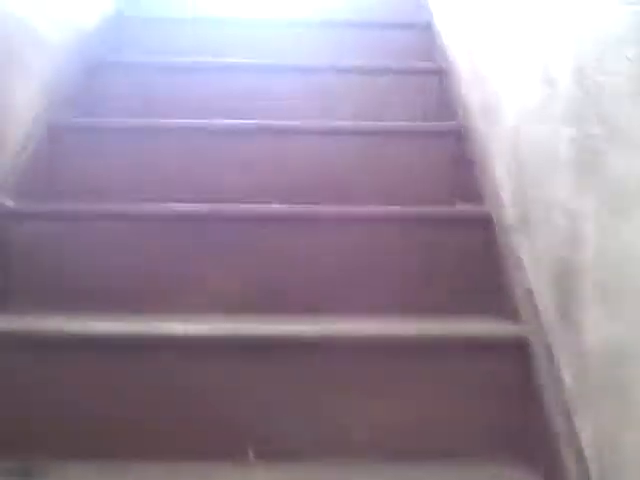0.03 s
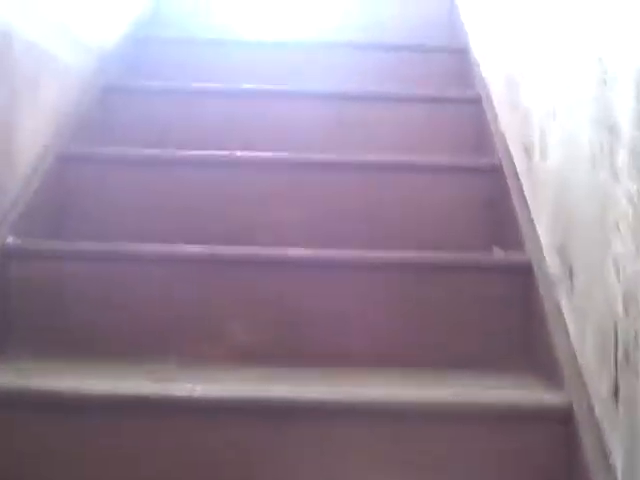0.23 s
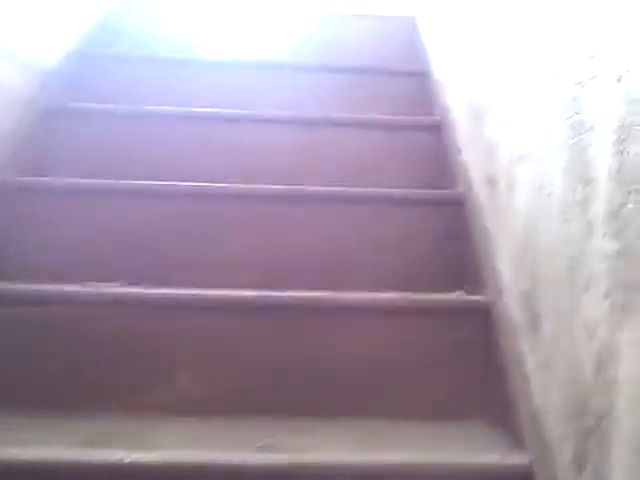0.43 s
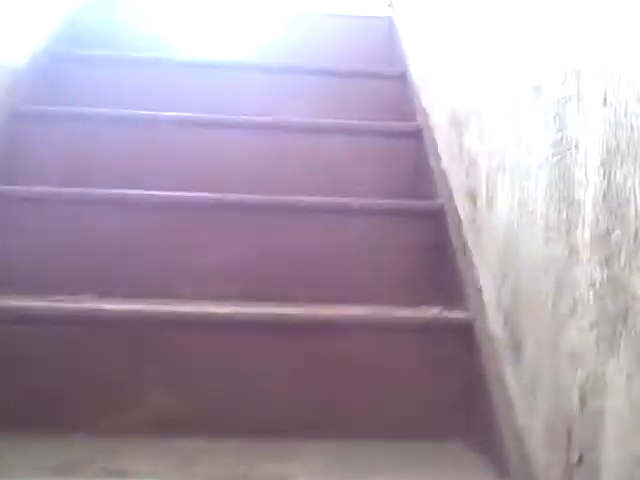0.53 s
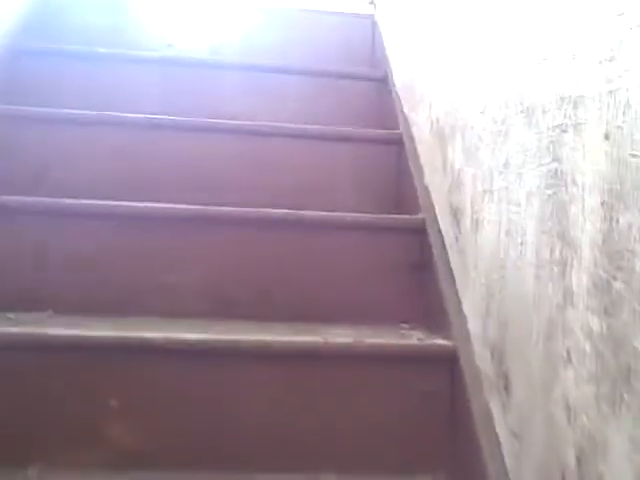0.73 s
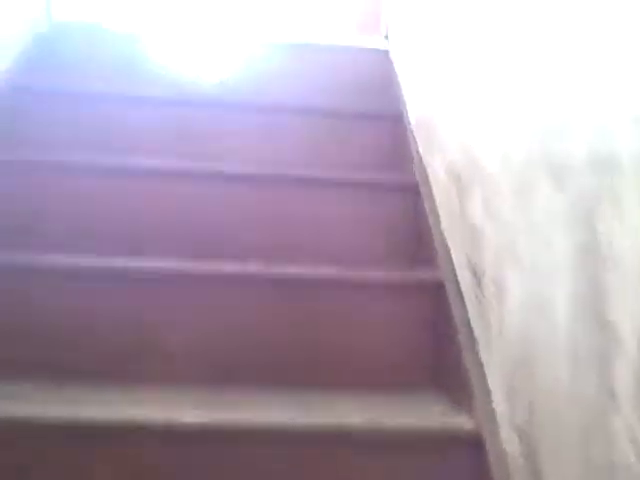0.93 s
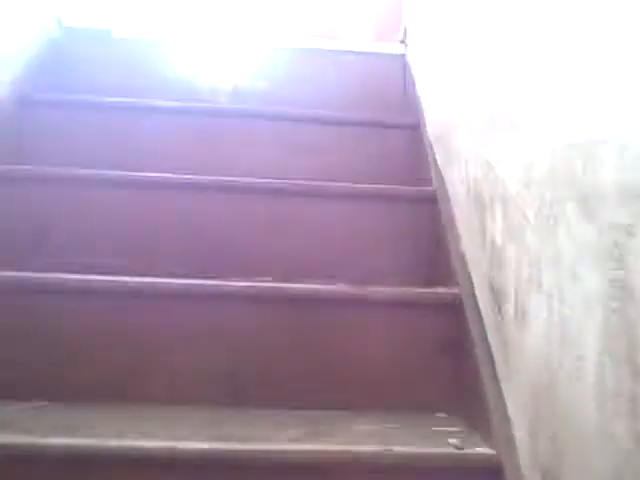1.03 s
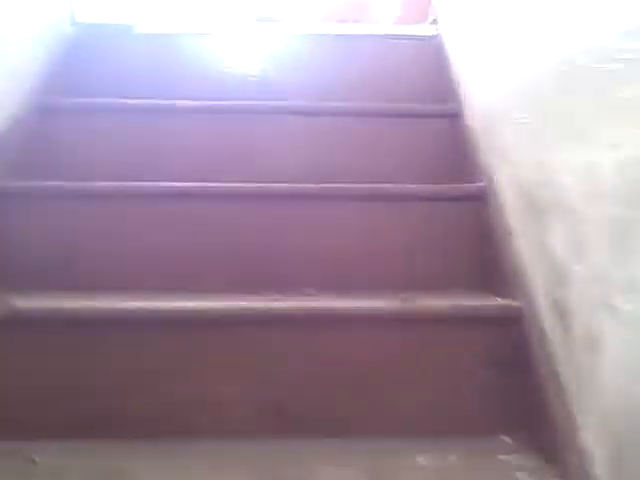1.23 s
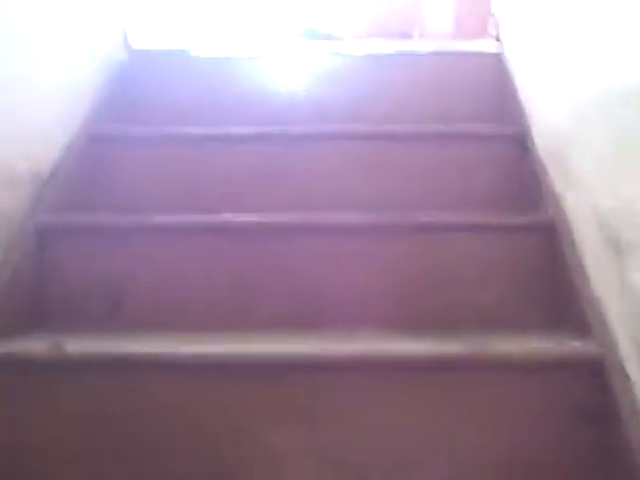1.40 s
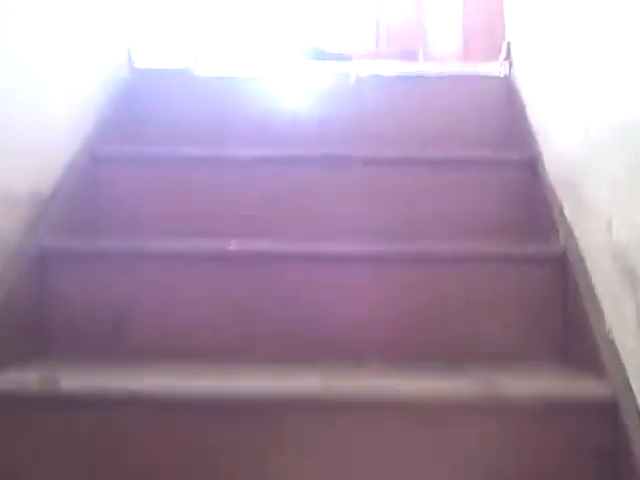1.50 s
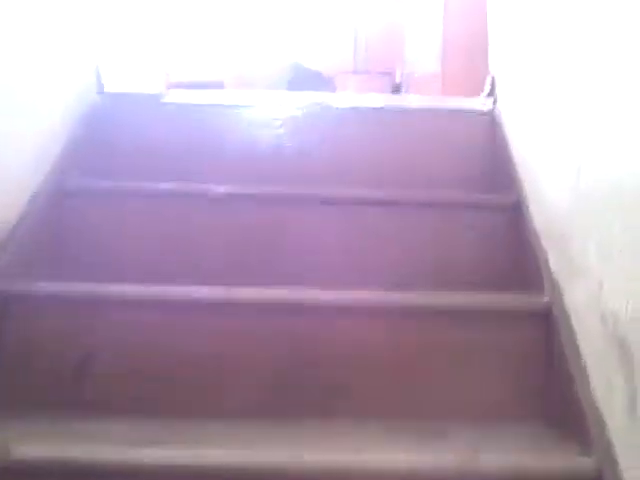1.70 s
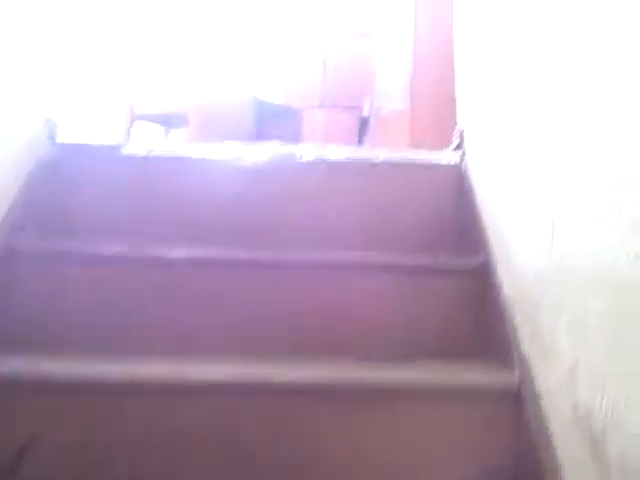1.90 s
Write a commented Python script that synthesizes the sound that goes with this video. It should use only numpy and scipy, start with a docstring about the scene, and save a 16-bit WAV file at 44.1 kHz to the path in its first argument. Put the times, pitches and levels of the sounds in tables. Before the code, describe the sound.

Heavy footsteps climb wooden stairs, three booming treads with faint squeaks and clothing rustle.

```python
"""Three heavy footsteps climb a narrow wooden staircase between plaster walls, over low rumble and hiss.
After a soft scuff the first lands at 0.24 s: the sole slaps the tread, the weight makes the flight
thud and boom, and the stairwell rings briefly. The second lands at 0.86 s between two faint squeaks,
the third at 1.45 s. Shoes and clothes scuff and rustle between the steps and after the last."""
import sys
import numpy as np
from scipy import signal
from scipy.io import wavfile

SR = 44100
rng = np.random.default_rng(int(sys.argv[2]) if len(sys.argv) > 2 else 0)


def inscribe(sig):
    """Save sig as 16-bit PCM at rate SR to the path in sys.argv[1].

    A 1-D sig is mono; a 2-D sig holds one channel per row.
    Samples are clipped to [-1, 1] before scaling.
    """
    pcm = np.round(np.clip(np.atleast_2d(sig).T, -1, 1) * 32767)
    wavfile.write(sys.argv[1], SR, pcm.astype(np.int16))


N = 85995
T = np.arange(N) / SR

# Footfalls. Each row: start in seconds, boom, knock, slap and grit gains in dB, thud level in dB,
# thud pitch in Hz, thud swell in seconds, stairwell gain in dB.
STEPS = [(0.2361, 4, 2.5, 3.5, 4.5, -22, 42, 0.0055, -3), (0.857, 0.5, -10, -6, -2, -23, 43.7, 0.052, 0),
         (1.4531, -6.5, -5.5, -14, -7, -20, 38.7, 0.0062, 5)]


def from_db(db):
    """Decibels to gain."""
    return 10 ** (np.asarray(db) / 20)


def at_hz(points, hz):
    """Read a table on a log-frequency axis."""
    return np.interp(np.log(hz), np.log(np.array(points)[:, 0]), np.array(points)[:, 1])


def hump(hz, centre_hz, octaves):
    """Bell over log frequency."""
    return np.exp(-.5 * (np.log2(hz / centre_hz) / octaves) ** 2)


def since(start_s):
    """Seconds since the start, zero before it."""
    return np.maximum(T - start_s, 0)


def sine(start_s, hz):
    """Sine from zero phase at the start."""
    return np.sin(2 * np.pi * hz * since(start_s))


def dying(start_s, t60_s):
    """Sudden start, exponential decay."""
    return (T >= start_s) * np.exp(-np.log(1000) * since(start_s) / t60_s)


def swelling(start_s, swell_s, t60_s):
    """Linear rise, exponential decay."""
    rise = np.minimum(since(start_s) / swell_s, 1)
    return rise * np.exp(-np.log(1000) * since(start_s + swell_s) / t60_s)


def band_noise(level):
    """Third-octave noise bands, each driven by level(hz), a gain or an envelope."""
    edges_hz = 22 * 2 ** (np.arange(30) / 3)
    out, lead = 0, SR // 5   # lead-in settles the filters
    white = rng.standard_normal((2, N + lead))
    for k, (low, high) in enumerate(zip(edges_hz, edges_hz[1:])):
        envelope = np.pad(level(np.sqrt(low * high)) * np.ones(N), (lead, 0), "edge")
        band = signal.butter(2, [low, high], "band", fs=SR, output="sos")
        out = out + signal.sosfilt(band, envelope * white[k % 2] + 1e-18)
    return out[lead:]


def background():
    """Steady rumble and hiss, with a faint narrow band high up."""
    # Each row: frequency in Hz, relative noise density in dB.
    air = [(25, 18.5), (50, 11), (100, -2.5), (200, -1), (400, -5), (700, -11.5), (1300, -17.5),
           (2500, -22.5), (5000, -27.5), (10000, -29.5), (15000, -37.5)]
    whine_hz, half_width_hz = 10840, 300
    edges_hz = [whine_hz - half_width_hz, whine_hz + half_width_hz]
    band = signal.butter(2, edges_hz, "band", fs=SR, output="sos")
    whine = signal.sosfilt(band, rng.standard_normal(N))
    return band_noise(lambda hz: from_db(at_hz(air, hz) - 35)) + from_db(-75.5) * whine / whine.std()


def squeaks():
    """Short thin tones that waver and sag in pitch."""
    # Each row: start and length in seconds, first and last pitch in Hz, level in dB.
    glides = [(0.742, 0.1, 549.6, 540, -50), (0.911, .075, 454, 419, -44)]
    waver_depth, waver_hz = 0.016, 55
    waver = signal.sosfilt(signal.butter(2, waver_hz, fs=SR, output="sos"), rng.standard_normal(N))
    bend = 1 + waver_depth * waver / waver.std()
    out = np.zeros(N)
    for start_s, length_s, first_hz, last_hz, db in glides:
        progress = np.clip(since(start_s) / length_s, 0, 1)
        hz = (last_hz + (first_hz - last_hz) * (1 - progress) ** 2) * bend
        envelope = np.sqrt(abs(np.sin(np.pi * progress)))
        out += from_db(db) * envelope * np.sin(2 * np.pi * np.cumsum(hz) / SR)
    return out


def scuffs():
    """Shoes and clothes rub, the foot bumps as it settles, cloth rustles as the leg swings through."""
    # Each row: start in seconds, level in dB, centre in Hz, width in octaves, swell and T60 in seconds.
    rubs = [(0.0, -28.5, 594, 0.37, 0.0047, 0.23), (0.711, -39.5, 1390, 0.96, 0.037, 0.3),
            (0.995, -40.5, 1940, 0.96, 0.042, 0.44), (0.998, -25.5, 253, 1.12, 0.027, 0.43),
            (1.226, -31, 715, 0.3, 0.0066, 0.16), (1.69, -41.5, 700, .4, 0.1, 2.2),
            (1.85, -46, 1200, 0.41, 0.017, 0.48)]
    # Each row: start in seconds, level in dB, centre in Hz.
    bumps = [(0.2388, -20.5, 330), (0.882, -31, 260), (.904, -32, 330), (0.96, -30, 110), (1.225, -33, 400),
             (1.471, -17.5, 690)]
    # Each row: start in seconds, level in dB.
    rustles = [(.42, -60), (1.02, -50.5), (1.659, -56)]
    rustle_peak_hz, rustle_db_per_octave = 4040, -5
    bursts = [(from_db(db) * swelling(start_s, swell_s, t60_s), centre_hz, octaves)
              for start_s, db, centre_hz, octaves, swell_s, t60_s in rubs]
    bump_octaves = 0.73
    bursts += [(from_db(db) * dying(start_s, t60_s=0.062), centre_hz, bump_octaves)
               for start_s, db, centre_hz in bumps]
    cloth = sum(from_db(db) * swelling(start_s, swell_s=0.027, t60_s=0.17) for start_s, db in rustles)

    def level(hz):
        power = sum((burst * hump(hz, centre_hz, octaves)) ** 2 for burst, centre_hz, octaves in bursts)
        tilt = from_db(rustle_db_per_octave * abs(np.log2(hz / rustle_peak_hz)))
        return np.sqrt(power + (cloth * tilt) ** 2)
    return band_noise(level)


def clacks():
    """Sole and board answer the first touch with a few heavily damped resonances."""
    # One list per footfall. Each row: frequency in Hz, level in dB.
    clack_modes = [
        [(340, -20), (660, -21), (1000, -23), (1420, -24), (1850, -24.5), (2250, -19), (2850, -22),
         (3380, -28.5), (4400, -27.5)],
        [(450, -29), (1950, -29.5), (2800, -29.5), (3570, -30.5)],
        [(430, -22), (640, -19.5), (960, -22), (1370, -20.5), (2050, -31), (3250, -36.5)],
    ]
    out = np.zeros(N)
    for (start_s, *_), modes in zip(STEPS, clack_modes):
        for k, (hz, db) in enumerate(modes):
            out += (-1) ** k * from_db(db) * dying(start_s, t60_s=0.021) * sine(start_s, hz)
    return out


def slaps():
    """Gritty crack of the sole, early reflections between close walls, then the stairwell's tail."""
    # Sole on tread. Each row: frequency in Hz, relative noise density in dB.
    contact = [(100, -9), (250, -13), (600, -8), (1300, -3), (2600, -6.5), (4500, -9), (8000, -33),
               (15000, -39)]
    # Stairwell response. Each row: frequency in Hz, relative noise density in dB.
    well = [(100, 8), (170, -1.5), (260, -0.5), (350, 1.5), (490, -6), (660, 2), (1100, -9), (1700, -8),
            (2400, -8), (4500, -17), (8000, -29), (15000, -40.5)]
    # Stairwell decay. Each row: frequency in Hz, T60 in seconds.
    well_t60 = [(100, .35), (350, 0.49), (800, 0.65), (2400, 0.55), (5000, 0.38), (12000, 0.38)]
    contact_db, well_db, early_db, build_s = -12, -17, -4, 0.0052

    def level(hz):
        power = 0
        for start_s, boom_db, knock_db, slap_db, grit_db, *_, step_well_db in STEPS:
            # Each pair: frequency in Hz, this footfall's gain in dB.
            colour = [(198, boom_db), (620, knock_db), (1430, knock_db),
                      (1680, slap_db), (4040, slap_db), (10000, grit_db)]
            crack = dying(start_s, t60_s=0.021) * from_db(contact_db + at_hz(contact, hz))
            early = from_db(early_db) * swelling(start_s, build_s, t60_s=0.16)
            tail = swelling(start_s, build_s, at_hz(well_t60, hz))
            reverb = (early + tail) * from_db(well_db + step_well_db + at_hz(well, hz))
            power = power + from_db(at_hz(colour, hz)) ** 2 * (crack ** 2 + reverb ** 2)
        return np.sqrt(power)
    return band_noise(level)


def staircase():
    """Each footfall rings its tread and heaves the flight, which sways again as the weight shifts."""
    # One list per tread. Each row: frequency in Hz, level in dB, T60 in seconds.
    tread_modes = [
        [(78.5, -21.5, 0.277), (101, -28, 0.41), (121, -20, 0.19), (170, -24.5, .24), (217.6, -33, .35),
         (347, -27.5, 0.19), (613, -28, 0.11), (718, -36, 0.19), (773, -34.5, 0.32), (1877, -41.5, 0.48),
         (2297, -32, 0.12), (2338, -43.5, 0.38), (2630, -52, 0.094), (3140, -47, 0.12)],
        [(78.9, -30.5, 0.52), (101.9, -35.5, 0.6), (143.2, -32, 0.284), (188, -39, 0.93), (333, -45.5, 0.53),
         (672, -37.5, 0.13), (1417, -39, 0.092), (1740, -61, .2), (2110, -57, .22), (2380, -49, .25),
         (2875, -46, 0.38), (3340, -38.5, 0.057)],
        [(63, -32.5, 0.31), (107.8, -27.5, 0.23), (195.6, -31, 0.31), (305, -33, 0.098), (417, -36, .25),
         (545, -36.5, 0.11), (629, -30.5, 0.2), (688.6, -33, 0.35), (945, -37.5, 0.33), (1007, -38, 0.14),
         (1340, -50, 0.12), (1306, -39.5, 0.07), (1462, -46, 0.17)],
    ]
    # Each row: start in seconds, level in dB, frequency in Hz.
    sways = [(0.399, -39.5, 35.7), (1.017, -32.5, 27.95), (1.594, -35, 31.7)]
    out = np.zeros(N)
    for (start_s, *_, thud_db, thud_hz, swell_s, _), modes in zip(STEPS, tread_modes):
        for k, (hz, db, t60_s) in enumerate(modes):
            out += (-1) ** k * from_db(db) * dying(start_s, t60_s) * sine(start_s, hz)
        heave = from_db(thud_db) * swelling(start_s, swell_s, t60_s=0.21)
        out += heave * np.cos(2 * np.pi * thud_hz * since(start_s))
    for start_s, db, hz in sways:
        out += from_db(db) * swelling(start_s, swell_s=0.02, t60_s=0.69) * sine(start_s, hz)
    return out


def scene():
    """Footfalls, small noises and background, summed in mono."""
    return (clacks() + slaps() + staircase() + scuffs() + squeaks() + background())[None]


def record(dry):
    """Steep low-pass at 16 kHz."""
    return signal.sosfilt(signal.ellip(12, .1, 80, 16000, fs=SR, output="sos"), dry)


dry = scene()
out = record(dry)
inscribe(out)
```